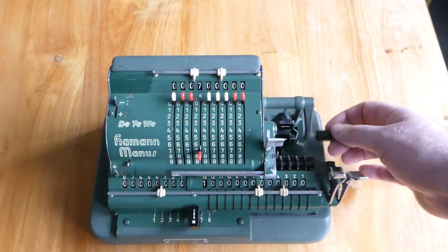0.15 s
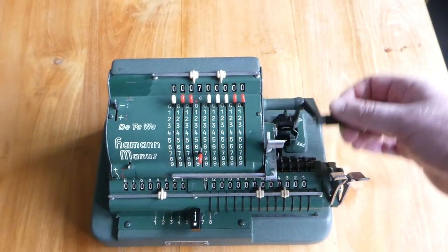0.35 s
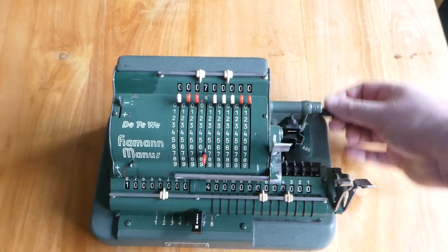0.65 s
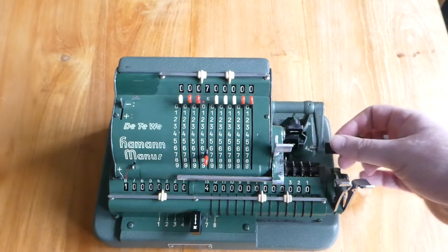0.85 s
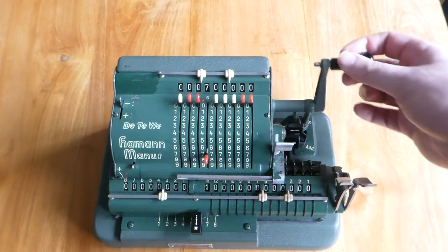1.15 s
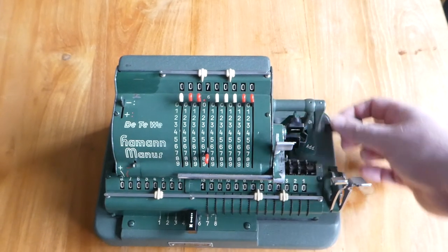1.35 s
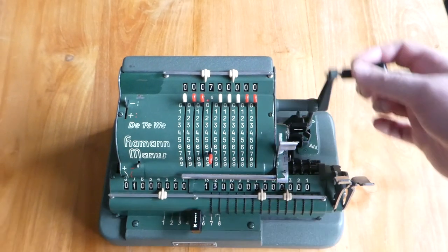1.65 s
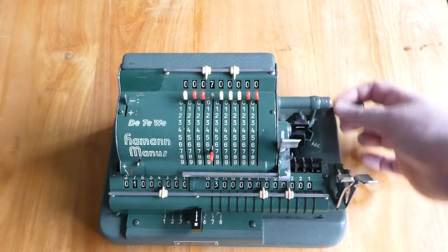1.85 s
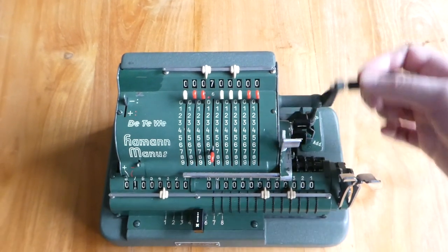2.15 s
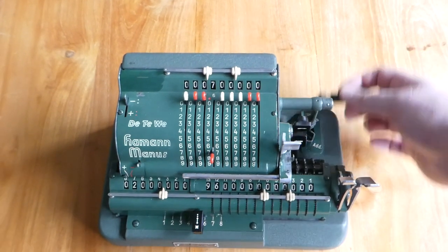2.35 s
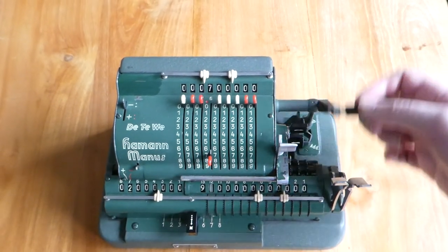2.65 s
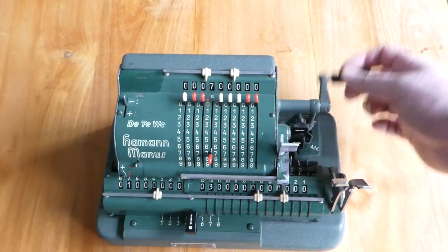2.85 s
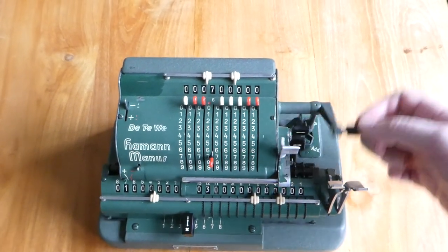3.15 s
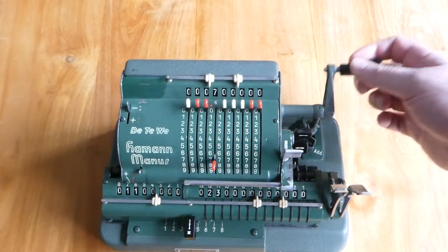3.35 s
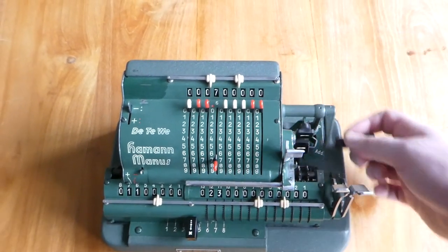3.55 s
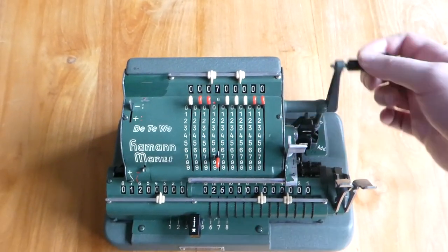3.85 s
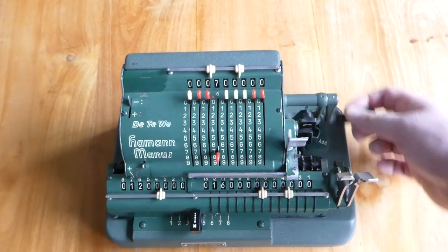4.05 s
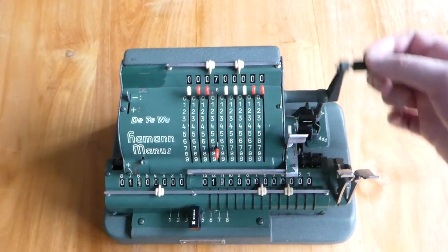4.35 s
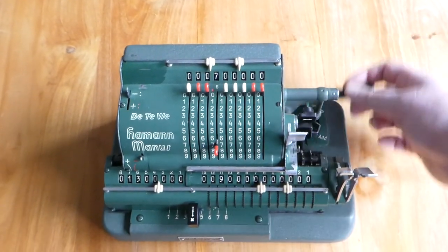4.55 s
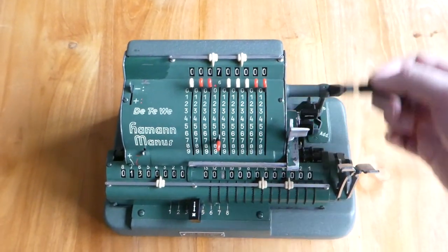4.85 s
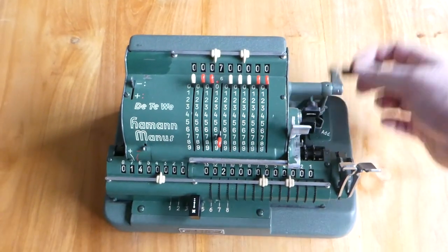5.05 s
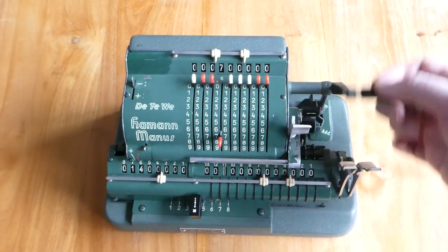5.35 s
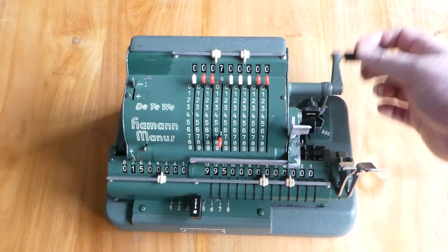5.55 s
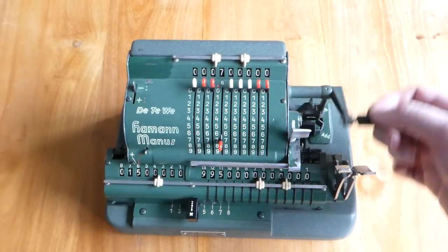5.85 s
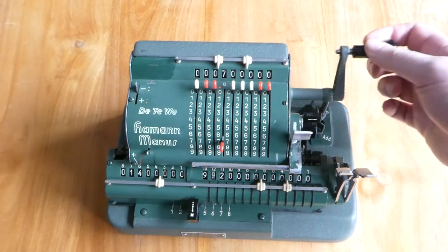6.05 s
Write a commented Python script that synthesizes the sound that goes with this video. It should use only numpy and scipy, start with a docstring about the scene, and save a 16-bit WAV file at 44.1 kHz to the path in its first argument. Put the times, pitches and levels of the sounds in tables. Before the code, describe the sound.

Rapid, rhythmic metallic clatter from a crank calculator: gears engage, seven tiny teeth buzz past in a tenth of a second, then dense clicks and a sharper clack follow. The first turns are slightly slower, then the pace is steady with uneven accents. Faint gear grinding fills the gaps; the table adds light dull thuds. Heard closely in a small, short-sounding room.

```python
"""A hand-cranked mechanical calculator, about two turns a second, on a wooden table in a small room.
In each turn the register wheels whirr over seven teeth; pawls, cam, links, latch and carry or release follow.
Each contact is a chattering force that excites damped modes of the case, works and small parts.
Pulls of the hand and heavy carries excite table modes; decaying noise is the room, shaped noise the air."""
import sys
import numpy as np
from scipy import signal
from scipy.fft import rfft, irfft
from scipy.io import wavfile

SR = 44100
rng = np.random.default_rng(int(sys.argv[2]) if len(sys.argv) > 2 else 0)


def dump_mix(stems):
    """Bounce the given channels to the path in sys.argv[1] as a 16-bit WAV at rate SR."""
    frames = np.atleast_2d(stems).T  # one column per channel
    limited = np.clip(frames, -1, 1)  # hard clip at full scale
    pcm = np.round(limited * 32767).astype(np.int16)
    wavfile.write(sys.argv[1], SR, pcm)


def volts_from_db(level):
    """Convert decibel levels to linear amplitude ratios."""
    exponent = np.asarray(level, float) / 20
    return 10 ** exponent


N = 273420   # length [samples]

# Crank gears grinding through one turn: (share of the turn, works level [dB], case ring level [dB])
GRIND = [(0, -38, -56), (.15, -39, -32), (.35, -34, -33.5), (.5, -38.5, -42), (.7, -39.5, -45),
         (.85, -41.5, -41), (.97, -40, -44)]
# Effort of the hand on the crank: (time [s], level [dB])
EFFORT = [(0, 5), (.1, -19.5), (.2, -22), (.24, -4), (.4, -1.5), (.9, -2), (1.5, 1.3), (3, 0.7), (4.5, 1.5),
          (6.2, 3)]
TURN_S = .545   # assumed length of the turns outside the table [s]
# Modes of the steel case: (frequency [Hz], relative level [dB], T60 [s])
CASE_MODES = [(638, -31, 0.15), (740.7, -22.5, 0.085), (901.5, -16.5, 0.048), (952, -18.5, 0.11),
              (1022.6, -14.5, 0.042), (1230, -25.5, 0.032)]
# Modes of the works: (frequency [Hz], relative level [dB], T60 [s])
WORKS_MODES = [(1318, -23.5, 0.006), (1704, -23, 0.019), (1902, -20, 0.013), (2080, -22, 0.076),
               (2190, -17, 0.017), (2327, -16, 0.014), (2414, -23, 0.019), (2627, -18.5, 0.01),
               (2896, -17, 0.0083), (3330, -23, 0.032), (3528, -21, 0.018), (3767, -21, 0.0076),
               (4030, -30, 0.0079), (4510, -25, 0.0015)]
# Modes of the small parts: (frequency [Hz], relative level [dB], T60 [s])
SMALL_PART_MODES = [(5370, -21, 0.028), (6150, -18, 0.0058), (6600, -15.5, 0.0067), (7220, -16.5, 0.0055),
                    (7940, -17.5, 0.0039), (8790, -18, 0.0028), (9866, -13.5, 0.0015), (10970, -29, 0.011),
                    (13600, -50, 0.011), (14700, -38, 0.0038)]
# Modes of the table top: (frequency [Hz], relative level [dB], T60 [s])
TABLE_MODES = [(144, -26.5, 0.036), (171, -21.5, 0.12), (209, -23, 0.071), (279, -34.5, 0.0098),
               (345, -22.5, 0.1), (448, -13.5, 0.013)]
# The hand's pull rocks the base: (time [s], relative level [dB])
THUMPS = [(.591, -37.5), (1.909, -48), (3.391, -42), (3.937, -37.5), (4.486, -38.5), (5.03, -36.5),
          (5.55, -40)]
# Decay of the room: (frequency [Hz], T60 [s])
ROOM_T60 = [(150, 0.43), (700, 0.54), (2000, 0.2), (5000, 0.19), (13000, 0.28)]
# Spectrum of the room tone: (frequency [Hz], relative level [dB])
AIR_SPECTRUM = [(18, -45), (30, -14), (337, -5), (629, -20), (837, -15), (1030, -12), (1410, -7),
                (2770, -17), (15000, -31)]

# Turns of the crank: (gears engage [s], relative contact level [dB], relative whirr level [dB])
TURNS = [(.396, -17.5, -30), (1.036, -16, -30), (1.595, -13, -32), (2.14, -13.5, -31.5), (2.675, -15, -32),
         (3.209, -14, -33), (3.76, -16, -30.5), (4.296, -16.5, -29), (4.861, -16, -30),
         (5.372, -16.5, -28.5), (5.921, -17.5, -32)]
# The six teeth before the last: (relative level [dB])
TEETH_DB = [-24, -17, -25.5, -26, -21.5, -17]
# The seventh tooth lands and the wheels stop: (time [s], relative level [dB])
STOPS = [(.516, -18), (1.148, -14), (1.702, -21.5), (2.239, -19), (2.786, -16), (3.316, -19.5),
         (3.871, -18), (4.412, -16), (4.965, -17.5), (5.48, -17.5), (6.034, -19.5)]
FIRST_TOOTH = .17   # share of the run
TICK_JITTER_S, TICK_SCATTER_DB = 0.00155, 2   # standard deviations, for teeth and gear ticks
# Single teeth that stand out in the whirr of the wheels: (time [s], relative level [dB])
STRONG_TEETH = [(.422, -13), (.437, -14), (1.093, -24), (1.132, -22), (2.189, -14), (2.725, -17),
                (3.218, -23), (3.805, -19), (3.815, -17), (3.856, -18), (4.382, -19.5), (4.922, -16.5),
                (4.957, -18), (5.416, -18), (5.989, -15.5), (5.998, -17)]
# Pawls: (time [s], relative level [dB])
PAWLS = [(1.159, -15.5), (1.759, -14.5), (1.771, -13.5), (2.299, -12), (2.31, -14), (2.843, -11),
         (2.857, -14), (3.379, -17), (3.396, -15.5), (3.927, -15), (3.942, -15.5), (4.48, -15.5),
         (4.497, -13.5), (5.543, -16), (5.561, -11.5), (5.576, -13.5), (6.103, -13), (6.119, -10.5),
         (6.138, -17)]
# Cams: (time [s], relative level [dB])
CAMS = [(.642, -15.5), (1.287, -19), (1.826, -22.5), (2.367, -23.5), (2.913, -22), (3.457, -20),
        (3.997, -19.5), (4.556, -17), (5.091, -16), (5.618, -21.5), (6.183, -23.5)]
# A follower rides over its cam in a few touches: (delay [s], relative level [dB])
CAM_RIDE = [(-.007, -16), (-.003, -6), (0, -3.5), (.005, -8)]
# Links: (time [s], relative level [dB])
LINKS = [(.707, -24.5), (.719, -28.5), (1.349, -23.5), (1.365, -24.5), (1.873, -26.5), (1.895, -23),
         (2.412, -22.5), (2.432, -29), (2.958, -25), (2.977, -25), (3.501, -26.5), (3.517, -22.5),
         (4.043, -24.5), (4.064, -23), (4.599, -29), (4.617, -21), (5.15, -23.5), (5.172, -20.5),
         (5.661, -22), (5.683, -27)]
# Levers: (time [s], relative level [dB])
LEVERS = [(.754, -28), (1.378, -20), (1.919, -23.5), (2.455, -22), (3.007, -23), (3.535, -24), (4.087, -23),
          (4.637, -22.5), (5.711, -18)]
# Latches, before a carry: (time [s], relative level [dB])
LATCHES = [(.76, -13.5), (1.393, -11.5), (2.464, -16.5), (3.024, -10.5), (5.721, -24)]
# A latch slides home in three touches: (delay [s], relative level [dB])
LATCH_SLIDE = [(-.003, -13.5), (0, -3), (.0025, -7.5)]
# Carries, a heavy clack in some turns: (time [s], relative level [dB])
CARRIES = [(.772, -7), (1.404, -7.5), (2.475, -7.5), (3.032, -9), (5.732, -7.5)]
# The feet jolt at each carry, then the base settles: (delay [s], relative level [dB])
CARRY_THUMP = [(.002, -27.5), (0.0136, -24)]
# Catches before a release, ringing the case: (time [s], relative level [dB])
CATCHES = [(1.94, -16), (3.564, -17), (4.663, -19.5)]
# Releases, in turns without a carry: (time [s], relative level [dB])
RELEASES = [(1.952, -13), (3.575, -14.5), (4.118, -13), (4.674, -12.5), (5.2, -10)]
# Each release bounces twice: (delay [s], relative level [dB])
BOUNCES = [(0.0104, -9.5), (0.029, -20.5)]
# Parts come home: (time [s], relative level [dB])
HOMES = [(.916, -16.5), (1.502, -19), (2.037, -30), (2.572, -19.5), (3.113, -21), (3.66, -20), (4.199, -17),
         (4.758, -20), (5.283, -18.5), (5.822, -20.5)]
# Play taken up while the crank is slow: (time [s], relative level [dB])
SLACK = [(.231, -34), (.332, -32.5), (.357, -41), (.825, -22.5), (.987, -36), (1.008, -27.5)]
# Dull knocks on the case: (time [s], relative level [dB])
KNOCKS = [(.001, -28), (.269, -44), (.292, -33.5), (.567, -29.5), (.616, -24.5), (.971, -36), (1.31, -38),
          (1.747, -28), (2.28, -32), (4.254, -31.5), (4.796, -36), (5.013, -31.5), (5.026, -37),
          (5.041, -33.5), (5.528, -40), (5.555, -29.5), (6.093, -31)]
# Colour of each kind of contact:
# (case relative level [dB], small parts relative level [dB], tilt of the works [dB per octave])
COLOUR = dict(engage=(-1.5, 0.17, 5.8), tooth=(0, -7, -8), last=(1.7, 1.96, 16), pawl=(-3.4, -1.5, 6.1),
          cam=(0.5, -0.28, 16), link=(-3.5, -10.5, 15), lever=(-10, -15, -13), latch=(-3.5, -4, -21),
          catch=(4.8, 0.98, 1.5), snap=(-16, -6, 3), carry=(-5, -8, 19.5), release=(-7.5, -47, 1.3),
          bounce=(-12, -2.5, 22.6), home=(-9, -6.5, -18.5), gear=(-11, -27, 1.5), slack=(-4, -9, 0.1),
          knock=(10.7, -2, -12))
COLOUR["strong_tooth"] = COLOUR.pop("snap")


def rms_one(x):
    """Normalisation: scale to unit rms."""
    return x / np.sqrt(np.mean(x ** 2) + 1e-20)


def at_hz(points, hz):
    """Interpolation of a (frequency, value) table on a logarithmic axis."""
    frequencies, values = np.array(points).T[:2]
    return np.interp(np.log(hz + 1), np.log(frequencies), values)


def fade(x, seconds):
    """Exponential relaxation: a one-pole decay with this time constant; an impulse keeps its height."""
    return signal.lfilter([1], [1, -np.exp(-1 / (seconds * SR))], x + 1e-18)


def ring(force, hz, t60):
    """Driven damped resonance, radiating little far below its pitch; white force keeps about its rms."""
    radius, angle = volts_from_db(-60 / (t60 * SR)), 2 * np.pi * hz / SR
    radiation = np.sqrt((1 - radius * radius) / 2) * np.array([1, 0, -1])
    return signal.lfilter(radiation, [1, -2 * radius * np.cos(angle), radius ** 2], force)


def grit(per_s, spread_db):
    """Shot noise: tiny metal contacts at random moments with uneven strength; unit rms."""
    strength = volts_from_db(spread_db * np.minimum(rng.exponential(1, N), 4))
    sizes = strength * rng.choice([-1, 1], N)
    return rms_one(sizes * (rng.random(N) < per_s / SR))


def lumps(per_s, seconds, depth):
    """Stick-slip modulation: a gain around 1 jumps at random moments and sinks back as teeth catch."""
    jumps = np.abs(grit(per_s, spread_db=5.0))
    return 1 - depth + depth * rms_one(fade(jumps, seconds))


def echoes(rows, pattern):
    """Superposition: repeat each (time, level) row at the delays and levels of a pattern."""
    return (np.array(rows)[:, None] + pattern).reshape(-1, 2)


def grinding():
    """Periodic friction: one pattern per turn, scaled by effort, gives the works and case gains."""
    t, starts = np.arange(N) / SR, [row[0] for row in TURNS]
    starts = [starts[0] - TURN_S, *starts, starts[-1] + TURN_S]
    angle = np.interp(t, starts, np.arange(len(starts))) % 1
    share, works_db, ring_db = np.transpose(GRIND)
    effort_db = np.interp(t, *np.transpose(EFFORT))
    works = volts_from_db(np.interp(angle, share, works_db) + effort_db)
    case = volts_from_db(np.interp(angle, share, ring_db) + effort_db)
    return works, case


def calculator():
    """Modal superposition: contacts, wheels and grind together excite case, works and small parts."""
    s, db, case_db, small_db, tilt = contacts()
    spin = wheels()
    catching = lumps(per_s=76, seconds=0.0028, depth=0.33)
    grind, hum = catching * grinding()

    case = struck(CASE_MODES, (s + 0.00096, db + case_db - 1.5, 0 * tilt), volts_from_db(-5.0) * spin + volts_from_db(3) * hum,
                  chatter_s=0.0039, rise_s=0.00092, knock=15.8, scatter_db=3.0,
                  shiver_db=-7.5, shiver_s=0.019, apart=0.21, focus_db=11.5)
    works = struck(WORKS_MODES, (s, db + 5.5, tilt), volts_from_db(1.5) * spin + volts_from_db(1.0) * grind,
                   chatter_s=0.0007, rise_s=0.002, knock=4.4, scatter_db=4.0,
                   shiver_db=-14, shiver_s=0.025, apart=0.23, focus_db=3.5)
    small = struck(SMALL_PART_MODES, (s, db + small_db + 4, 0 * tilt), volts_from_db(0.5) * spin + volts_from_db(-5.3) * grind,
                   chatter_s=0.00086, rise_s=0.0007, knock=1.0, scatter_db=5.0,
                   shiver_db=-12.5, shiver_s=0.022, apart=0.3, focus_db=0.0)

    # left and right gains [dB]
    near = case * volts_from_db([[-.8], [.8]]) + works * volts_from_db([[-.7], [.7]]) + small * volts_from_db([[.6], [-.6]])
    low_cut = signal.butter(2, 380, "high", fs=SR, output="sos")
    shake = spin + volts_from_db(2.5) * grind
    return signal.sosfilt(low_cut, near + cracks()), shake


def table(shake):
    """Structure-borne transmission: feet pass heavy jolts and a little rumble on to the wood's modes."""
    s, db = np.vstack([THUMPS, echoes(CARRIES, CARRY_THUMP)]).T
    jolts = np.zeros(N)
    jolts[np.round(s * SR).astype(int)] = volts_from_db(db)
    soft = fade(fade(jolts, seconds=0.00027), seconds=0.00027)
    rocking = fade(fade(jolts, seconds=0.013), seconds=0.0023) / 150   # the base rocks on for a moment
    out = 0
    for hz, mode_db, t60 in TABLE_MODES:
        noise = rng.standard_normal(N) + 1.3 * rng.standard_normal((2, N))   # shared, then per ear
        rumble = (volts_from_db(-12.0) * shake + volts_from_db(8.5) * rocking) * noise
        out = out + volts_from_db(mode_db) * ring(volts_from_db(-2.5) * soft + rumble, hz, t60)
    return out * volts_from_db([[.6], [-.6]])


def air():
    """Stationary coloured noise: a faint steady room tone."""
    colour = volts_from_db(at_hz(AIR_SPECTRUM, np.fft.rfftfreq(N, 1 / SR)))
    spectrum = rfft(rng.standard_normal((2, N))) * colour
    return volts_from_db(-57) * rms_one(irfft(spectrum, N))


def contacts():
    """Impact sequence: every contact as time, level and colour; rules add teeth, touches and bounces."""
    luck = rng.standard_normal((len(TURNS), len(TEETH_DB), 2))
    teeth = tooth_times()[:, :-1] + TICK_JITTER_S * luck[..., 0]
    teeth_db = TEETH_DB + TICK_SCATTER_DB * luck[..., 1]
    kinds = dict(
        engage=np.array(TURNS)[:, :-1], tooth=np.c_[teeth.ravel(), teeth_db.ravel()],
        last=STOPS, strong_tooth=STRONG_TEETH,
        pawl=PAWLS, cam=echoes(CAMS, CAM_RIDE), link=LINKS, lever=LEVERS,
        latch=echoes(LATCHES, LATCH_SLIDE), carry=CARRIES, catch=CATCHES,
        release=RELEASES, bounce=echoes(RELEASES, BOUNCES), home=HOMES,
        gear=gear_ticks(), slack=SLACK, knock=KNOCKS)
    rows = [(s, db, *COLOUR[kind]) for kind, events in kinds.items() for s, db in events]
    return np.transpose(rows)


def struck(modes, ticks, steady, chatter_s, rise_s, knock, scatter_db, shiver_db, shiver_s, apart, focus_db):
    """Impact excitation: blows knock once, chatter briefly and leave loose parts shivering."""
    times, db, tilt = ticks
    at, out = np.round(times * SR).astype(int), np.zeros((2, N))
    # the ears hear partly different contacts
    force = grit(per_s=14000, spread_db=2.0) + apart * grit(per_s=14000, spread_db=4.0) * [[1], [-1]]
    luck = rng.standard_normal((len(at), len(modes)))
    heavy = np.zeros(N)
    heavy[at] = volts_from_db(1.59 * db + shiver_db)   # grows faster than the blow itself
    shiver = fade(heavy, shiver_s)
    teeth = lumps(per_s=90, seconds=0.01, depth=0.42)
    middle = np.sqrt(modes[0][0] * modes[-1][0])
    for k, (hz, mode_db, t60) in enumerate(modes):
        octaves = np.log2(hz / middle)
        blows = np.zeros(N)
        blows[at] = volts_from_db(db + tilt * np.clip(octaves, -.55, .8) + scatter_db * luck[:, k])
        swell = fade(fade(blows, chatter_s), rise_s) / (rise_s * SR)
        catch = np.roll(teeth, k // 3 * 9001)   # each group of parts catches at its own moments
        light = steady * volts_from_db(-focus_db * abs(octaves))   # light contact rings the central modes most
        drive = (shiver + light) * catch
        push = (swell + drive) * force + knock * blows * (-1) ** k
        out += volts_from_db(mode_db) * ring(push, hz, t60)
    return out


def room(x, gap_s=0.0042):
    """Diffuse reverberation: octave bands of dying noise, partly shared by the ears, after a short gap."""
    t, echo = np.arange(SR // 2) / SR, 0
    for hz in 125 * 2 ** np.arange(7.):
        top = min(hz * np.sqrt(2) ** (1 + (hz > 5000)), 17000)   # the highest band reaches further up
        band = signal.butter(2, [hz / np.sqrt(2), top], "band", fs=SR, output="sos")
        decay = volts_from_db(-60 * t / at_hz(ROOM_T60, hz))
        echo = echo + signal.sosfilt(band, rng.standard_normal((3, len(t)))) * decay
    echo = (echo[:2] + 1.04 * echo[2]) * np.clip(t / gap_s - 1, 0, 1)
    echo = echo / np.sqrt(np.sum(echo ** 2) / 2)   # unit mean energy
    return signal.fftconvolve(x, echo, axes=1)[:, :N]


def wheels():
    """Amplitude modulation: the wheels' whirr starts suddenly, throbs per tooth and stops quickly."""
    on, teeth = np.zeros(N), tooth_times().ravel()
    for (start, _, db), (last, _) in zip(TURNS, STOPS):
        on[int(start * SR):int((last + .0129) * SR)] = volts_from_db(db)   # coasts past the last tooth
    cycles = np.interp(np.arange(N) / SR - .002, teeth, np.arange(len(teeth)))
    throb = 1 + .19 * np.cos(2 * np.pi * cycles)
    return fade(on, seconds=.0005) / 22 * throb * lumps(per_s=150, seconds=.004, depth=.3)


def tooth_times():
    """Uniform rotation: moments of the seven evenly spaced teeth of every run."""
    engage, last = np.array(TURNS)[:, :1], np.array(STOPS)[:, :1]
    return engage + np.linspace(FIRST_TOOTH, 1, len(TEETH_DB) + 1) * (last - engage)


def cracks():
    """Broadband impact: steel on steel opens each carry with a dry crack."""
    s, db = np.transpose(CARRIES)
    blows = np.zeros(N)
    blows[np.round(s * SR).astype(int)] = volts_from_db(db + 3.5)
    envelope = fade(fade(blows, seconds=0.00096), seconds=0.00023) / 9
    burst = envelope * grit(per_s=22000, spread_db=3.0)
    return signal.sosfilt(signal.butter(2, (2180, 7000), "band", fs=SR, output="sos"), burst)


def gear_ticks():
    """Gear meshing: faint, nearly even ticks of crank gear teeth late in every turn but the last."""
    starts = np.array(TURNS)[:, 0]
    spans = starts[:-1, None] + np.diff(starts)[:, None] * (.84, .92)   # shares of the turn
    s = np.concatenate([np.arange(end, begin, -.025) for begin, end in spans])
    luck = rng.standard_normal((len(s), 2))
    return np.c_[s + TICK_JITTER_S * luck[:, 0], -33.5 + TICK_SCATTER_DB * luck[:, 1]]


def scene():
    """Superposition of direct and diffuse sound: machine and table close below the microphone, room, air."""
    machine, shake = calculator()
    near = machine + table(shake)
    return near + volts_from_db(-13.5) * room(near) + air()


def roll_off(x):
    """The treble ends steeply here."""
    return signal.sosfilt(signal.butter(12, 16630, fs=SR, output="sos"), x)


def record(dry):
    """Band-limited transduction: a small microphone adds low hiss of its own and rounds the peaks."""
    low_cut = signal.butter(4, 120, "high", fs=SR, output="sos")
    high_cut = signal.butter(6, 15000, fs=SR, output="sos")
    hiss_band = signal.butter(2, [25, 90], "band", fs=SR, output="sos")
    own = volts_from_db(-46.5) * signal.sosfilt(hiss_band, rng.standard_normal((2, N)))
    heard = signal.sosfilt(np.vstack([low_cut, high_cut]), dry) + own
    mix = 1.02 * np.tanh(heard / 1.302)
    return roll_off(mix)


dry = scene()
out = record(dry)
dump_mix(out)
```